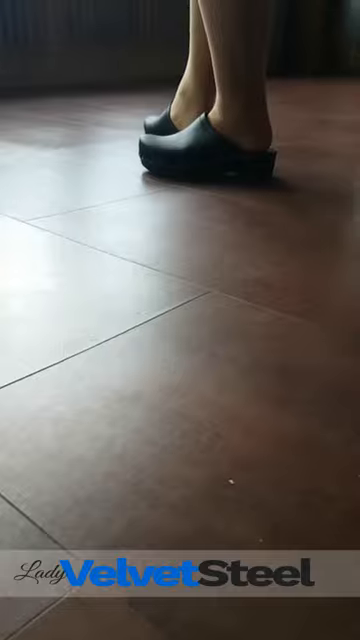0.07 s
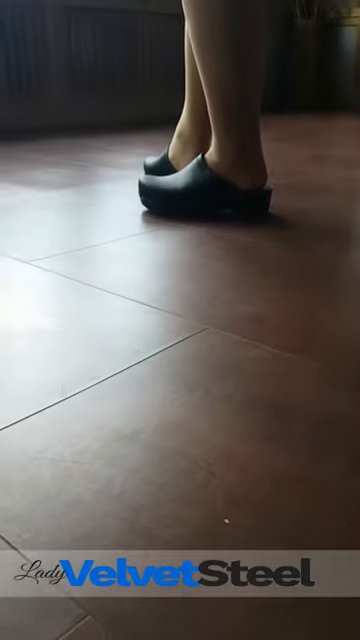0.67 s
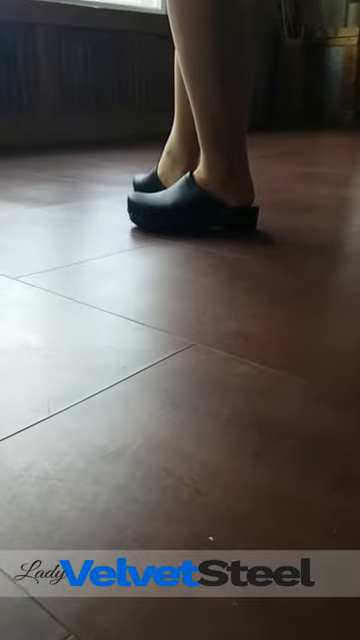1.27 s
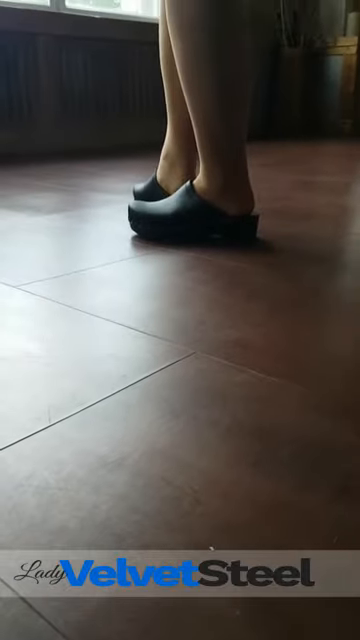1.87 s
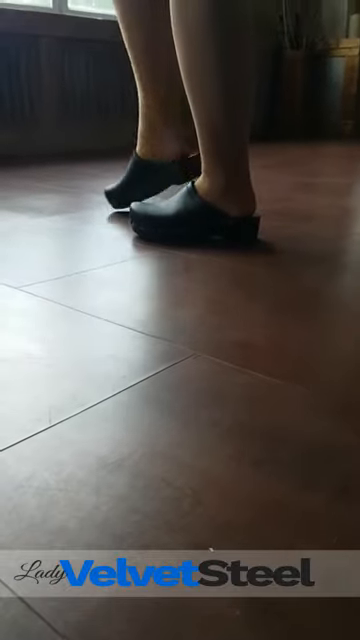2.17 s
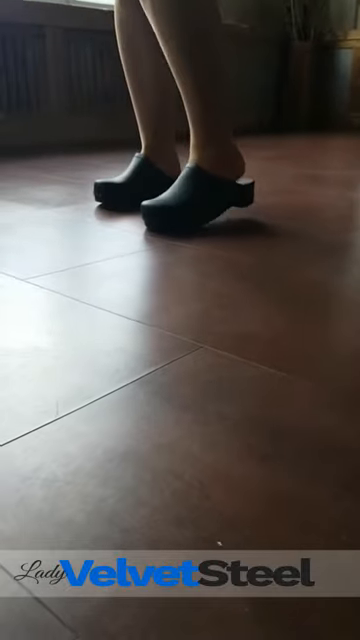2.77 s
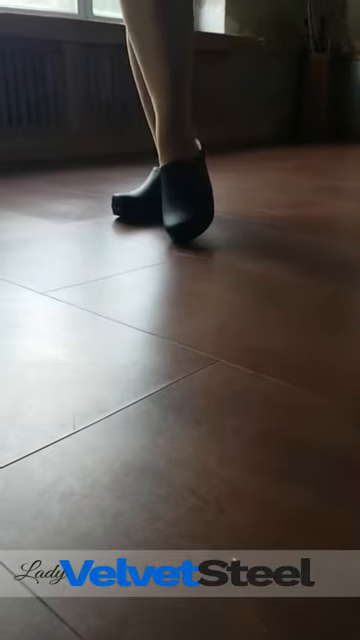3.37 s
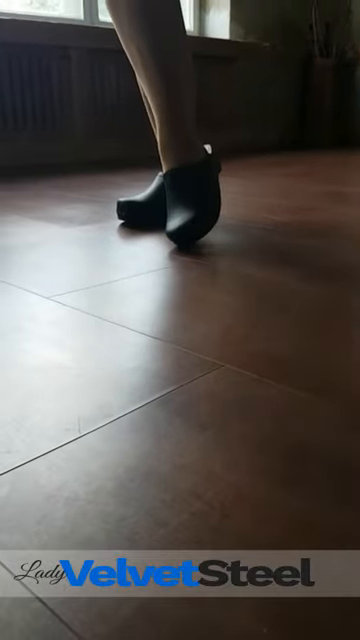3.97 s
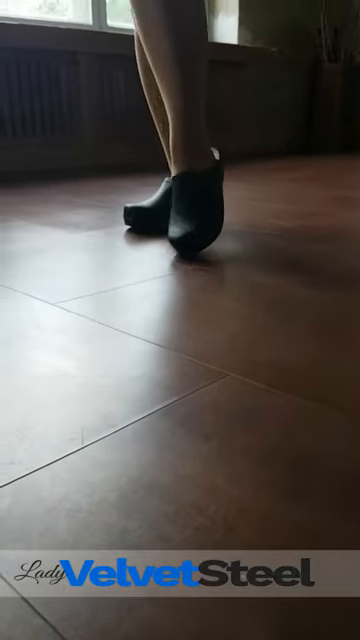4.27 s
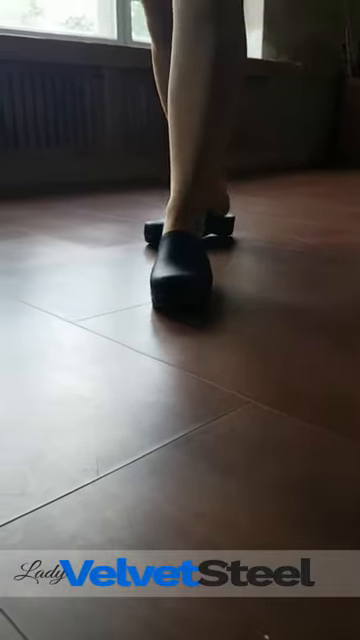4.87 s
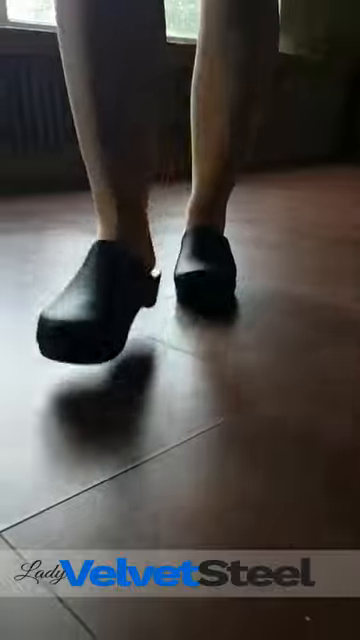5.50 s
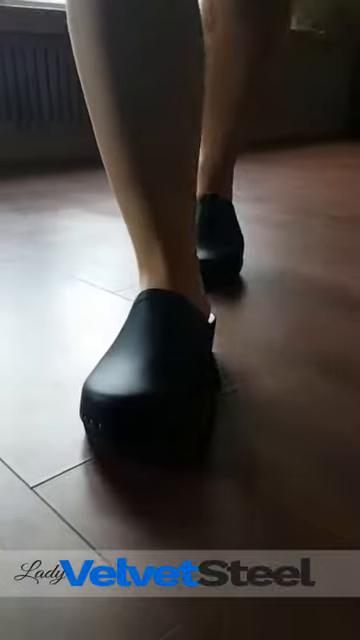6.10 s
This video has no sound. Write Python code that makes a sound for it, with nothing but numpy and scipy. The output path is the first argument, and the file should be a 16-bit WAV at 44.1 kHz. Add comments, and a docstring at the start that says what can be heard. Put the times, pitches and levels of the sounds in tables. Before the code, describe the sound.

Someone in clogs pivots on a hard indoor floor, heard from a low microphone nearby. The room starts with only a soft rumble and hiss, then comes a thud, rasping slides, squeaks and a duller creaking rub. Two loud, dry pops hit the left channel alone. A couple of clacking steps with scuffs between them come closer, ringing briefly in the bare room, and the last one squeaks.

```python
"""A bare, echoing room, where clogs pivot and step on a hard floor.
Sliding friction makes the soles rub and rasp; stick-slip oscillation gives arching squeaks when the
slips lock into a period and creaks when they do not. Impacts thud and excite the modes of the wood.
A low drone, perhaps far traffic, fills the room. Two sharp pops sound in the left channel alone."""
import sys
import numpy as np
from scipy import signal
from scipy.fft import rfft, irfft
from scipy.io import wavfile

SR = 44100
rng = np.random.default_rng(int(sys.argv[2]) if len(sys.argv) > 2 else 0)


def store_pcm(level_fs):
    """Save levels as 16-bit WAV."""
    pcm = np.round(np.clip(level_fs, -1, 1) * 32767).astype(np.int16)
    wavfile.write(sys.argv[1], SR, np.atleast_2d(pcm).T)


N = 275184
TIME = np.arange(N) / SR


def drags(judder_db=-1.5, judder_hz=70):
    """Sliding friction: the sole rasps, rubs and grinds grit; its juddering grip modulates all three."""
    # slides of the sole: start t/s, rise t/s, hold t/s, fade t/s, then rasp, rub and grit level/dB
    slides = [ (1.998, .03, 0.018, 0.38, -67.5, -65.5, -66.5),
              (2.492, 0.031, 0.074, 0.09, -38.5, -54, -40.5),
              (2.657, 0.012, 0.04, 0.055, -42, -38.5, -43.5), (2.695, .02, 0.13, 0.14, -33, -45, -33.5),
              (2.807, 0.061, 0.12, 0.25, -34.5, -49, -41), (3.032, 0.057, 0.0076, 0.12, -47, -42, -50),
              (3.428, .095, 0.075, 0.23, -62, -44.5, -57.5), (3.568, 0.11, 0.017, 0.25, -53.5, -44, -55.5),
              (4.256, 0.022, 0.033, 0.049, -58, -55, -59), (4.3, 0.024, 0.015, 0.16, -52, -53.5, -54),
              (4.831, 0.016, 0.018, 0.032, -57.5, -63, -48), (4.911, 0.0029, 0.0028, .04, -52.5, -75, -63),
              (5.083, 0.017, .08, 0.1, -50, -54.5, -57), (5.2, 0.056, .04, 0.32, -81, -63, -63),
              (5.419, 0.11, 0.0098, .2, -82, -65.5, -91), (6.145, 0.042, .05, .1, -41.5, -46, -43.5)]
    # spectra of the bright rasp, the dull rub and the fine grit: f/Hz, level/dB
    rasp_spectrum = [(600, -25), (1200, -8.5), (1700, -4.5), (2350, 2), (2900, 2), (3700, -0.5), (4700, -2),
                     (5400, -6.5), (8000, -11)]
    rub_spectrum = [(100, -32), (300, 5), (520, 0), (800, 1), (1300, 0), (1800, -3.5), (3000, -9.5),
                    (6000, -70)]
    grit_spectrum = [(3000, -51), (5000, -11.5), (6200, -8.5), (7200, 0.5), (8300, -1.5), (9800, -4.5),
                     (12000, -2), (14000, -9), (16000, -16.5)]
    rasp, rub, grit = np.zeros((3, N))
    for start, rise, hold, fade, rasp_db, rub_db, grit_db in slides:
        push = stroke(start, rise, hold, fade)
        rasp = np.maximum(rasp, amp(rasp_db) * push)
        rub = np.maximum(rub, amp(rub_db) * push)
        grit = np.maximum(grit, amp(grit_db) * push)
    rasp *= uneven_grip(friction(rasp_spectrum, slips_per_s=6000, spread_db=0.46))
    rub *= friction(rub_spectrum, slips_per_s=3000, spread_db=3.06)
    grit *= friction(grit_spectrum, slips_per_s=14000, spread_db=2.2)
    return (rasp + rub + grit) * amp(judder_db * wander(judder_hz))


def friction(spectrum, slips_per_s, spread_db):
    """Shot noise: a dense random train of tiny slips of uneven size, filtered to a spectrum."""
    slips = (rng.random(N) < slips_per_s / SR) * rng.standard_normal(N)
    sizes = amp(spread_db * np.minimum(rng.exponential(1, N), 4))
    return unit(colour(slips * sizes, spectrum))


def uneven_grip(x, patchy_db=3.0, flicker_hz=35):
    """Amplitude modulation by band: spots of the sole catch and let go independently."""
    # centres of the flickering bands: f/Hz
    centres = [500, 1000, 1800, 2700, 3800, 5500, 8000, 12000]
    hz, spectrum = np.fft.rfftfreq(N, 1 / SR), rfft(x)
    bands = [irfft(spectrum * np.interp(hz, centres, row), N) for row in np.eye(len(centres))]
    return unit(sum(band * amp(patchy_db * wander(flicker_hz)) for band in bands))


def stroke(start, rise, hold, fade, onset_db=-15.5, sag_db_per_s=-10, release_db=-23):
    """Piecewise exponential envelope: a stroke of the sole swells, sags while held, then fades."""
    t = TIME - start
    db = onset_db * np.clip(1 - t / rise, 0, 1) + sag_db_per_s * np.clip(t - rise, 0, hold)
    return (t >= 0) * amp(db + release_db * np.clip((t - rise - hold) / fade, 0, 10))


def squeaks(jitter_hz=450, flutter_db=1.6, lock_hz=1193, attack_s=0.047, release_s=0.018):
    """Stick-slip oscillation: the pitch climbs as the sole speeds up and drops as it stops."""
    # pitch arches: start, top, end t/s; start, top, end f/Hz; level/dB, overtone gain/dB, relative jitter
    arches = [ (2.466, 2.530, 2.584, 1880, 2500, 1450, -44, -7, .038),
              (2.696, 2.777, 2.801, 1130, 2450, 2000, -32.5, 0.5, .019),
              (6.182, 6.21, 6.218, 968, 1610, 1490, -40, -14, 0.066)]
    # radiation response of the sole: f/Hz, level/dB
    sole = [(550, -7), (1050, -11), (1400, 2.5), (1750, -.5), (2100, -2.5), (2450, 1), (2900, -14),
            (3600, -11), (4000, -3), (4600, -3), (5200, -15), (13000, -22)]
    out, uneven = np.zeros(N), wander(jitter_hz)
    for start, top, end, start_hz, top_hz, end_hz, db, overtone_db, jitter in arches:
        on = (TIME >= start) & (TIME < end)
        t = TIME[on]
        progress = np.clip((t - start) / (top - start), 0, 1) ** 1.3  # the pitch hangs back at first
        climb = np.sin(np.pi / 2 * progress) ** 2
        drop = np.sin(np.pi / 2 * np.clip((t - top) / (end - top), 0, 1)) ** 2
        hz = start_hz + (top_hz - start_hz) * climb + (end_hz - top_hz) * drop
        loose_jitter = 0.12 / (1 + (hz / lock_hz) ** 10)  # slow slips come unevenly
        phase = 2 * np.pi * np.cumsum(hz * (1 + (jitter + loose_jitter) * uneven[on])) / SR
        tone = sum(amp(read(sole, k * hz) + overtone_db * (k > 1)) * np.sin(k * phase)
                   for k in range(1, 7))
        envelope = np.minimum((t - start) / attack_s, 1) * np.minimum((end - t) / release_s, 1)
        out[on] += amp(db) * tone * envelope
    return np.sqrt(2) * out * amp(flutter_db * wander(210))


def creaks(jitter_hz=450, flutter_db=0.5, overtone_db=-19.5):
    """Aperiodic stick-slip: uneven slips smear the tone of the sole into a creak."""
    # creaking strokes: start, rise, hold, fade t/s; f/Hz, glide/(Hz/s), level/dB, relative jitter
    strokes = [ (2.660, .015, 0.035, 0.029, 580, 7500, -44.5, 0.12),
               (2.789, .005, 0.017, .01, 3850, -5000, -40.5, 0.032),
               (2.812, 0.037, 0.072, 0.12, 2303, 899, -41.5, .09),
               (3.03, 0.032, 0.022, 0.051, 880, -500, -49, 0.17),
               (3.498, .12, 0.12, 0.17, 617, 300, -49, .25),
               (4.269, 0.0092, 0.069, .015, 1600, -1000, -52, .3),
               (4.912, 0.0028, 0.013, .14, 3350, -1000, -59.5, 0.1),
               (5.085, .008, .04, .025, 2318, 7007, -58.5, .09),
               (6.147, 0.0094, 0.072, .03, 1502, 4497, -50.5, .22)]
    out, uneven = np.zeros(N), wander(jitter_hz)
    for start, rise, hold, fade, hz, glide, db, jitter in strokes:
        pitch = hz + glide * np.clip(TIME - start, 0, rise + hold + fade)
        phase = 2 * np.pi * np.cumsum(pitch * (1 + jitter * uneven)) / SR
        tone = np.sin(phase) + amp(overtone_db) * np.sin(2 * phase)
        out += amp(db) * stroke(start, rise, hold, fade) * tone
    return np.sqrt(2) * out * amp(flutter_db * wander(170))


def knocks(thud_rise_cycles=0.33, contact_s=0.00034, tick_s=0.0025):
    """Impact excitation: each blow gives a damped thud, a modal ring and a tick of crushed grit."""
    # blows of heel and sole: t/s, thud level/dB, thud f/Hz, clack level/dB, tick level/dB,
    # gain to the room/dB (less when the foot is near)
    blows = [ (2.0290, -70, 300, -68, -60, -4), (2.3750, -21, 260, -38, -80, -1),
             (4.3280, -62, 400, -56, -39, -8), (4.8175, -31, 160, -46, -62, -3),
             (4.8205, -37, 200, -47, -47, -5), (4.8510, -42, 150, -58, -57, -3),
             (4.8895, -36, 230, -48, -66, -3), (4.9160, -50, 400, -43, -54, -4),
             (4.9260, -33, 560, -37, -64, -4), (4.9345, -46, 600, -48, -68, -4),
             (5.4100, -70, 300, -62, -60, -8), (5.8460, -72, 300, -70, -61, -8),
             (5.9850, -44, 200, -48, -54, -5), (5.9895, -43, 1100, -36, -52, -8),
             (6.0020, -30, 440, -39, -41, -9)]
    # modes of a clog: f/Hz, level/dB, T60/s
    modes = [(830, -29, 0.0083), (1173, -1, 0.027), (1536, 11.5, 0.0057), (1860, 14, 0.0026),
             (2370, 4, 0.0055), (3570, -13, .009), (4530, -19, .005)]
    # spectrum of the crushed grit: f/Hz, level/dB
    tick_spectrum = [(1000, -10.5), (2500, 8.5), (4300, 2.0), (8000, 1.0), (16000, -21.0)]
    direct, to_walls = np.zeros((2, N))
    t = np.arange(SR // 10) / SR
    ring = sum(amp(db - 60 * t / t60) * np.sin(2 * np.pi * hz * t) for hz, db, t60 in modes)
    ring *= 1 - np.exp(-t / contact_s)  # the sole takes a moment to press home
    ring /= abs(ring).max()
    grit = unit(colour(rng.standard_normal(N), tick_spectrum))
    for s, thud_db, thud_hz, clack_db, tick_db, room_db in blows:
        age = t * thud_hz / thud_rise_cycles
        thud = -age * np.exp(1 - age) * np.sin(2 * np.pi * thud_hz * t)
        bass_cut = signal.butter(2, thud_hz / 2, "high", fs=SR)  # a small sole radiates little bass
        thud = signal.lfilter(*bass_cut, thud)
        tick = grit[round(s * SR):][:len(t)] * np.exp(-t / tick_s)
        blow = amp(thud_db) * thud + amp(clack_db) * ring + amp(tick_db) * tick
        add(direct, s, blow)
        add(to_walls, s, amp(room_db) * blow)
    return direct, to_walls


def pops(bass_hz=82, damping=0.64, rise_s=0.00011):
    """High-pass step response: a jump in the left channel is pulled to rest by the bass roll-off."""
    # sudden steps: t/s, level/dB
    jumps = [(4.6256, -6), (4.7404, -9.5)]
    out, t = np.zeros((2, N)), np.arange(SR // 20) / SR
    angle, swing = 2 * np.pi * bass_hz * t, np.sqrt(1 - damping ** 2)
    step = np.exp(-damping * angle) * (np.cos(swing * angle) - damping / swing * np.sin(swing * angle))
    for s, db in jumps:
        add(out[0], s, amp(db) * step * np.minimum(t / rise_s, 1))
    return out


def room(direct, to_walls, lead_s=0.00008, echoes_per_s=5000):
    """Reverberation: dense, exponentially decaying reflections follow the direct sound."""
    # spectrum of the wall reflections: f/Hz, level/dB
    walls = [(100, 12.5), (500, -0.5), (1200, 4), (2500, 3), (5000, 4.5), (8000, -2.5), (15000, -21.5)]
    # reverberation time: f/Hz, T60/s
    decay_times = [(100, 0.27), (300, 1.42), (700, 1.08), (1500, 0.96), (3000, 1.1), (5000, 0.9),
                   (8000, 0.82), (15000, 0.17)]
    size = 3 * SR // 2
    echoes = rng.standard_normal((2, size)) * (rng.random((2, size)) < echoes_per_s / SR)
    hz, t, spectra = signal.stft(echoes, SR, nperseg=256)
    decay = amp(read(walls, hz)[:, None] - 60 * t / read(decay_times, hz)[:, None])
    tail = signal.istft(spectra * decay, SR, nperseg=256)[1][:, :size]
    tail *= np.clip((TIME[:size] - 0.004) / 0.0033, 0, 1)  # first reflections after 4 ms
    reverb = signal.fftconvolve(to_walls[None], tail / np.linalg.norm(tail[0]), axes=1)[:, :N]
    shift = round(lead_s * SR / 2)
    side = (np.roll(direct, -shift) - np.roll(direct, shift)) / 2  # the left leads slightly
    return np.array([direct + side, direct - side]) + reverb


def drone(waver_db=2.0, drift=0.0073, trim_db=-1):
    """Random amplitude and frequency modulation: low tones from outside waver as they swell and fade."""
    # course of the main tone: t/s, f/Hz, level/dB
    course = [(0.08, 103.7, -57.5), (0.5, 107, -51.5), (1.0, 107.8, -57), (1.15, 113, -43),
              (1.4, 112.1, -58.5), (1.53, 112, -43.5), (1.75, 112.5, -38), (1.88, 111.5, -52),
              (2.0, 114.2, -44.5), (2.3, 114.6, -39.5), (2.6, 116.9, -45.5), (3.12, 119.2, -45),
              (3.36, 111.9, -61), (3.46, 98.1, -52), (3.95, 98.6, -48.5), (5.2, 117.9, -67.5),
              (5.45, 124, -65), (6.24, 129, -58.5)]
    # other low tones: f/Hz, width/Hz, level/dB, peak t/s, t/s from peak to half amplitude
    booms = [(52.9, 5.1, -55, 0.61, 1), (180.9, 4.16, -55.5, 3.65, 1.22), (58.3, 1.76, -68.5, 3.8, 4.5),
             (247.8, 6.43, -65, 9.5, 7.9)]
    times, pitches, levels = np.transpose(course)
    cycles = np.cumsum(np.interp(TIME, times, pitches) * (1 + drift * wander(6.9))) / SR
    swell = amp(np.interp(TIME, times, levels + trim_db, left=-150, right=-150))
    tones = swell * np.sin(2 * np.pi * cycles) * amp(waver_db * wander(2.6))
    for hz, width_hz, db, peak_s, span_s in booms:
        cycles = np.cumsum(hz + width_hz / 2 * wander(width_hz)) / SR
        swell = amp(db + waver_db * wander(3.3)) / (1 + ((TIME - peak_s) / span_s) ** 4)
        tones += swell * np.sin(2 * np.pi * cycles)
    return np.sqrt(2) * tones


def background(start_s=0.068, fade_in_s=0.024, lull_s=4.97, lull_fade_s=0.35, lull_db=-15.5):
    """Ambient noise: rumble and drone from outside add to a faint hiss; the rumble dies down late on."""
    # spectra of the rumble and the hiss: f/Hz, level/dB
    rumble_spectrum = [(12, -3), (28, -42), (45, -1), (85, -3), (130, 3), (200, -7.5), (270, -3.5),
                       (350, -16), (500, -26), (900, -43), (3000, -54.5)]
    hiss_spectrum = [(200, 7.5), (600, 1.5), (1200, -6.5), (2200, -9), (4000, -15.5), (6500, -21),
                     (9500, -21), (13000, -16), (16000, -15)]
    lull = np.clip((TIME - lull_s) / lull_fade_s, 0, 1)
    rumble = amp(-49 + lull_db * lull) * unit(colour(rng.standard_normal((2, N)), rumble_spectrum))
    hiss = amp(-61) * unit(colour(rng.standard_normal((2, N)), hiss_spectrum))
    outside = (rumble + drone()) * amp([[-1.8], [1.4]])  # louder on the right
    return (outside + hiss) * np.clip((TIME - start_s) / fade_in_s, 0, 1)


def amp(db):
    """Amplitude ratio of a level in decibels."""
    return 10 ** (np.asarray(db) / 20)


def unit(x):
    """Normalisation to an rms of one."""
    return x / np.sqrt(np.mean(x ** 2) + 1e-20)


def read(points, hz):
    """Interpolation of a table on a log-frequency axis."""
    f, value = np.transpose(points)
    return np.interp(np.log(hz + 1), np.log(f), value)


def colour(x, spectrum):
    """Zero-phase filtering by a table of f/Hz, level/dB."""
    size = 2 * N
    gain = amp(read(spectrum, np.fft.rfftfreq(size, 1 / SR)))
    return irfft(rfft(x, size) * gain, size)[..., :N]


def wander(rate_hz):
    """Low-pass noise: smooth random motion of rms one."""
    hz = np.fft.rfftfreq(N, 1 / SR)
    return unit(irfft(rfft(rng.standard_normal(N)) / (1 + (hz / rate_hz) ** 4), N))


def add(mix, s, sound):
    """Superposition of a sound on the mix, starting at s seconds."""
    part = mix[round(s * SR):][:len(sound)]
    part += sound[:len(part)]


def scene():
    """Superposition of clogs, room, background and pops; the image is widest at middle frequencies."""
    # stereo width: f/Hz, side gain/dB
    width = [(50, -12.5), (250, -11), (600, -2.5), (1500, 1), (5000, 0.5), (6500, 2), (8000, -17),
             (16000, -23.5)]
    drag = amp(-6) * drags()
    stick_slip = squeaks() + creaks()
    knock, knock_to_walls = knocks()
    to_walls = amp(0.5) * drag + amp(-5.5) * stick_slip + knock_to_walls
    left, right = room(drag + stick_slip + knock, to_walls) + background()
    mid, side = (left + right) / 2, colour((left - right) / 2, width)
    return np.array([mid + side, mid - side]) + pops()


def record(dry):
    """Band limiting: a linear-phase low-pass removes the highest treble."""
    low_pass = signal.firwin(511, 16100, window=("kaiser", 9), fs=SR)
    return signal.oaconvolve(dry, low_pass[None], "same")


dry = scene()
out = record(dry)
store_pcm(out)
```